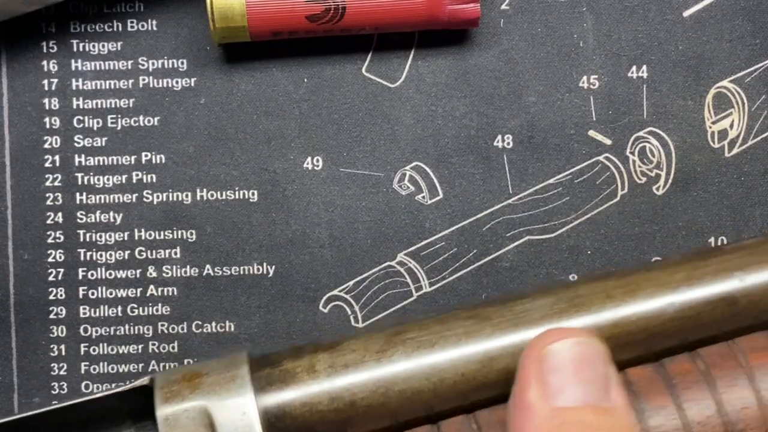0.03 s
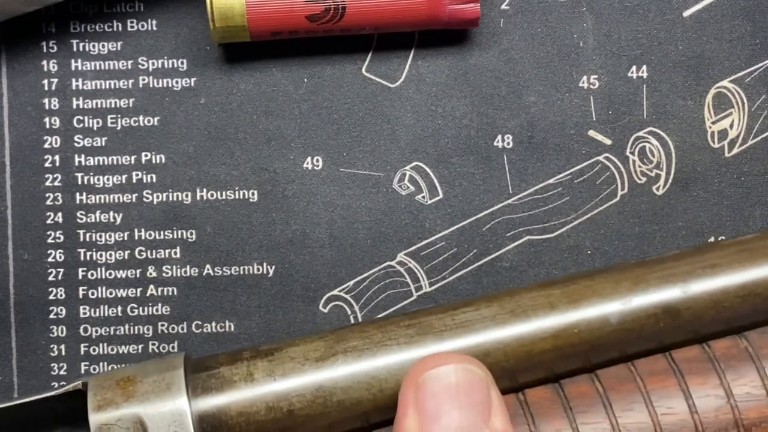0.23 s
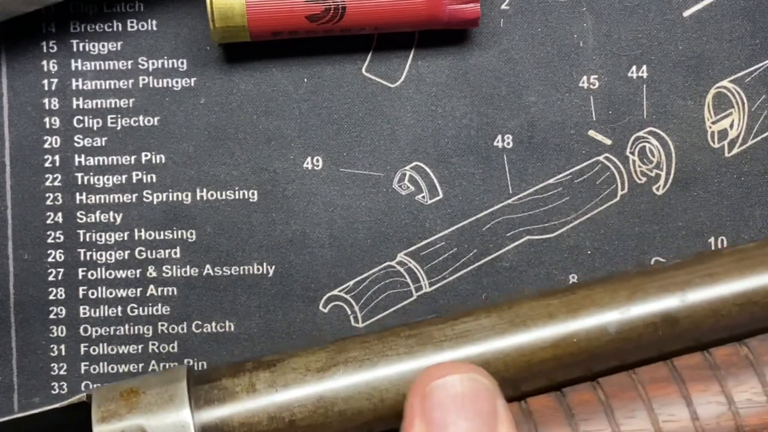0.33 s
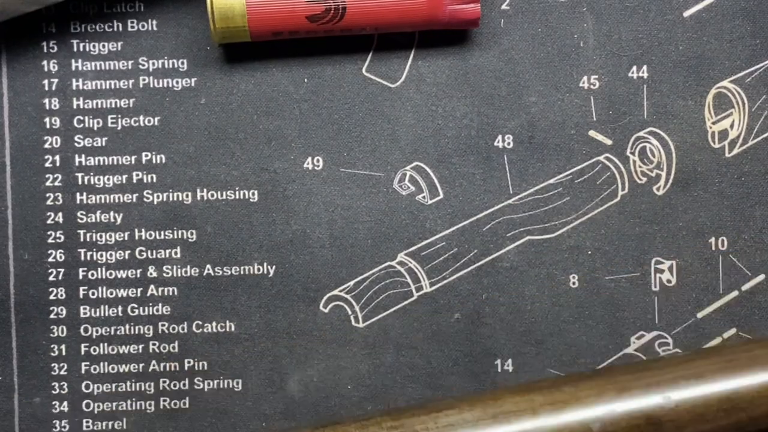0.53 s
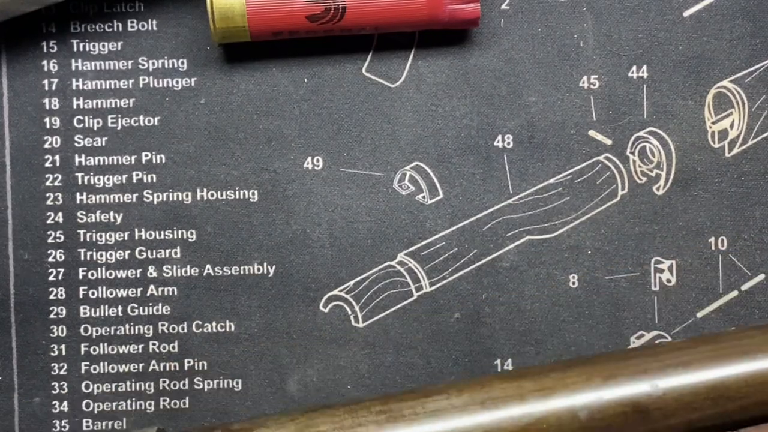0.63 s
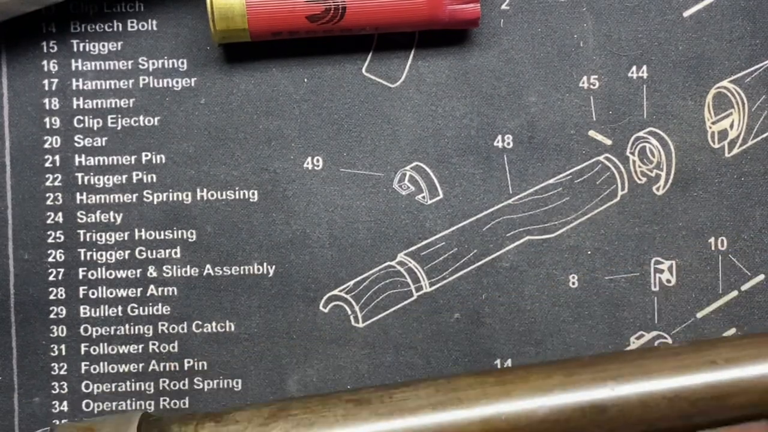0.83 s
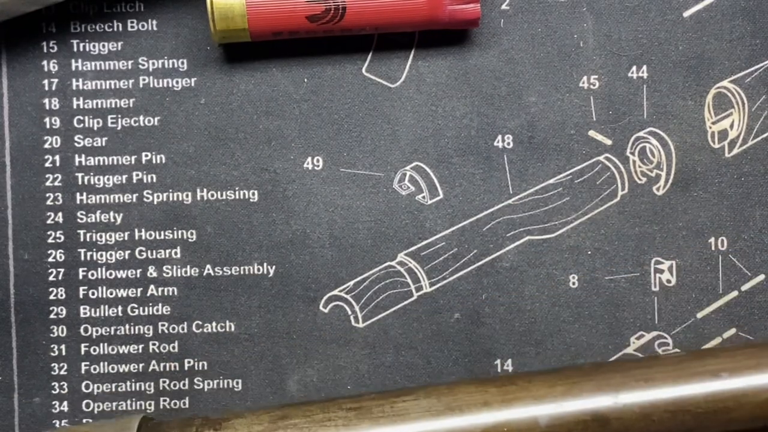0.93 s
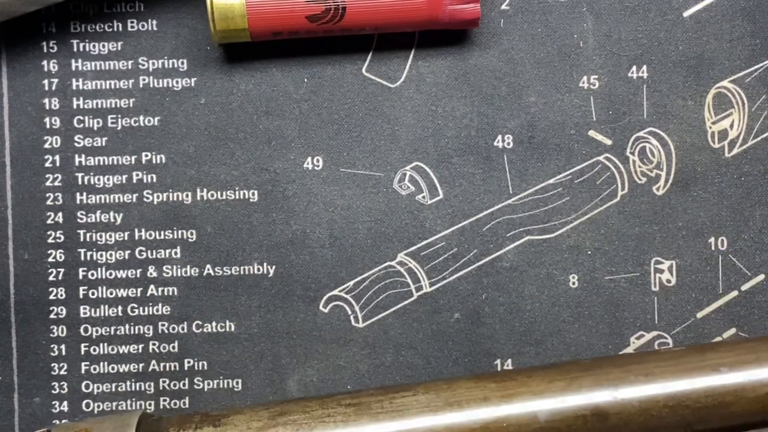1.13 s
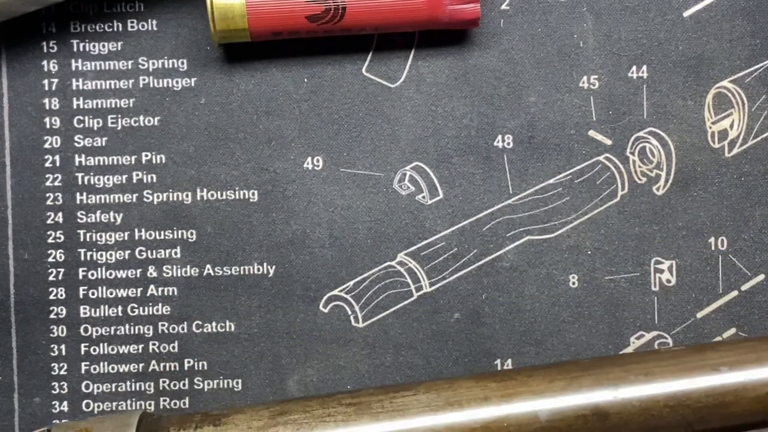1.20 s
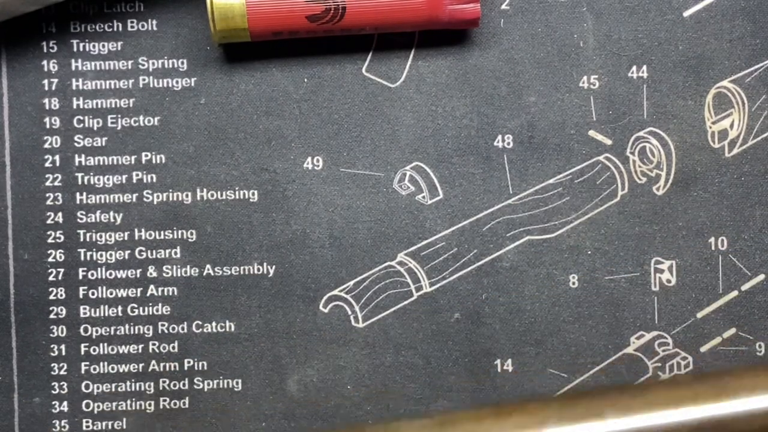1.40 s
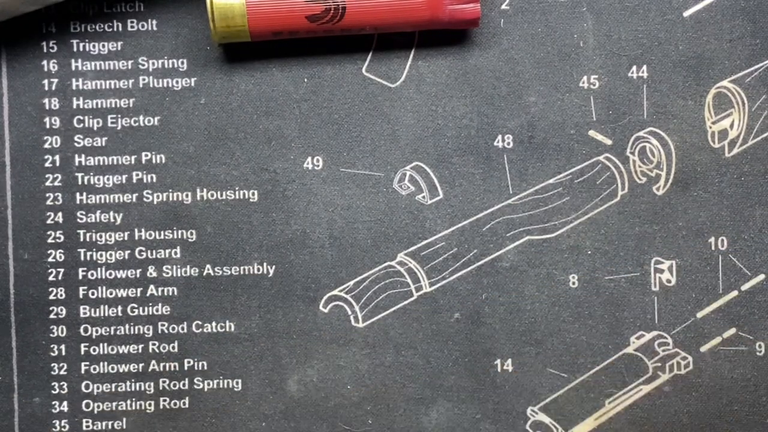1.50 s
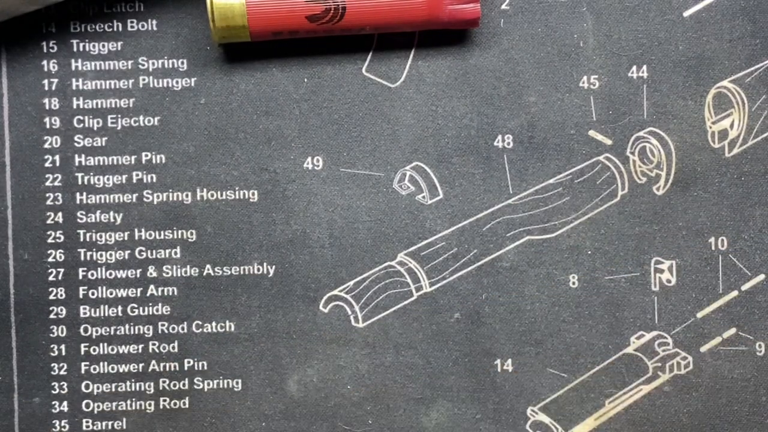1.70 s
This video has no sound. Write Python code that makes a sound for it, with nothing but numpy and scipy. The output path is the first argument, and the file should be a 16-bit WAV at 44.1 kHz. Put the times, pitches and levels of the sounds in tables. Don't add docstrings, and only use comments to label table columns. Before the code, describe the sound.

Two rattling metallic clacks and a dull thump as a heavy gun is picked up close by

```python
import sys
import numpy as np
from scipy import signal
from scipy.fft import rfft, irfft
from scipy.io import wavfile
from scipy.ndimage import uniform_filter1d

SR = 44100
rng = np.random.default_rng(int(sys.argv[2]) if len(sys.argv) > 2 else 0)


def dump_mix(stems):
    frames = np.atleast_2d(stems).T
    limited = np.clip(frames, -1, 1)
    pcm = np.round(limited * 32767).astype(np.int16)
    wavfile.write(sys.argv[1], SR, pcm)


def natural_amplitude(level_db):
    exponent = np.asarray(level_db, float) / 20
    return 10 ** exponent


N = 77175
T = np.arange(N) / SR
MID_SIDE = np.array([[1], [-1]])


def level(x, db):
    return x * natural_amplitude(db) / np.sqrt(np.mean(x ** 2))


def curve(rows):
    return np.interp(T, *np.array(rows, float).T)


def colour(x, points):
    hz, db = np.array(points, float).T
    f = np.arange(N // 2 + 1) * SR / N + 1
    return irfft(rfft(x) * natural_amplitude(np.interp(np.log(f), np.log(hz + 1), db)), N)


def band(x, low_hz, high_hz):
    sos = signal.butter(2, [low_hz, min(high_hz, .45 * SR)], "band", fs=SR, output="sos")
    return signal.sosfilt(sos, x)


def walk(rate_hz):
    k = int(SR / rate_hz)
    steps = np.repeat(rng.standard_normal(N // k + 1), k)
    return 1.7 * uniform_filter1d(uniform_filter1d(steps, k), k)[:N]


def air():
    # freq_hz, density_db [dB per Hz]
    air_colour = [(80, -17), (140, -7), (270, -17.5), (1100, -28.5), (1800, -26), (4500, -40.5),
                  (11800, -53.5), (13800, -46)]
    # time_s, gain_db
    duck = [(0, 22), (.34, 8), (.58, -11), (.7, -13), (.8, 10)]
    air_db, side_db = -75, -6
    hum_hz, hum_db = 311, -83
    duct_hz, duct_width_hz, duct_db = 1680, 260, -80
    whine_hz, whine_pulses_hz, whine_db = 10500, 60, -99

    mid, side = (level(colour(rng.standard_normal(N), air_colour), air_db) * natural_amplitude(0.85 * walk(4.2))
                 for _ in range(2))
    hum = natural_amplitude(hum_db + 2.6 * walk(22)) * np.sin(2 * np.pi * hum_hz * T)
    duct = band(rng.standard_normal(N), duct_hz - duct_width_hz / 2, duct_hz + duct_width_hz / 2)
    whine = band(rng.standard_normal(N), whine_hz - 200, whine_hz + 200)
    whine = whine * np.sin(np.pi * whine_pulses_hz * T) ** 4
    centre = mid + hum + level(duct, duct_db) + level(whine, whine_db)
    return (centre + natural_amplitude(side_db) * side * MID_SIDE) * natural_amplitude(curve(duck))


def rumble(db):
    centre_hz, width_hz = 70, 85
    edges_hz = centre_hz - width_hz / 2, centre_hz + width_hz / 2
    noise = band(band(rng.standard_normal(N), *edges_hz), *edges_hz)
    return level(noise * natural_amplitude(walk(9.2)), db)


def bench():
    # start_s, level_db, start_hz, end_hz, t60_s
    thumps = [
        (0.114, -34.5, 500, 61.3, 0.091),
        (0.179, -42.5, 604, 93, 0.048),
        (0.367, -42.5, 500, 110, .07),
        (.407, -43.5, 500, 110, .07),
        (0.483, -18, 620, 40.8, 0.14),
        (0.498, -27, 406.7, 48.8, 0.031),
        (.558, -48.5, 494, 60.1, 0.079),
    ]
    # centre_s, level_db, pitch_hz, half_length_s
    sways = [
        (0.002, -40, 84, 0.014),
        (0.317, -46, 57.4, 0.044),
        (0.672, -42, 46.5, 0.082),
        (.80, -47, 50, 0.015),
        (0.83, -39.5, 45, 0.027),
        (0.874, -26, 52, 0.018),
        (0.925, -39.5, 65, 0.012),
        (0.978, -45, 71.2, 0.012),
        (1.046, -51, 47, 0.12),
        (1.329, -45.5, 70, 0.014),
    ]
    rumble_db, side_db = -57, -76
    spread_turns = 0.78

    out = rumble(rumble_db) + rumble(side_db) * MID_SIDE
    for s, db, start_hz, end_hz, t60 in thumps:
        t = np.maximum(T - s, 0)
        turns = end_hz * t + spread_turns * np.log(1 + t * start_hz / spread_turns)
        out = out + natural_amplitude(db - 60 * t / t60) * np.sin(2 * np.pi * turns)
    for s, db, hz, half_s in sways:
        out = out + natural_amplitude(db) * np.exp(-((T - s) / half_s) ** 2) * np.cos(2 * np.pi * hz * (T - s))
    return out


def rub():
    # time_s, level_db
    strength = [(0, -54.5), (.07, -53), (.2, -46), (.27, -75.5), (.7, -81.5), (.78, -64.5), (.85, -64.5),
                (.95, -75.5), (1.06, -86), (1.16, -86.5), (1.24, -73.5), (1.32, -65.5), (1.35, -59.5),
                (1.39, -58), (1.43, -65), (1.485, -59), (1.6, -62), (1.67, -58.5), (1.75, -60)]
    # freq_hz, density_db [dB per Hz]
    friction_colour = [(200, -15.5), (600, -6), (1600, -2), (4800, -6), (8600, -9.5), (12000, -19),
                       (14500, -14.5)]
    # time_s, treble_db
    treble = [(0, -3.5), (.9, 0.5), (1.4, 4.5), (1.6, 6.5), (1.75, 9)]
    # pitch_hz, level_db
    resonances = [(1600, -13), (2300, -16), (5000, -25)]
    grit_db, uneven_db = 1.2, 1.5
    scrape_s, scrape_half_s, scrape_hz, scrape_db = 1.486, 0.031, 5130, -64

    grit = rng.standard_normal(N) * natural_amplitude(grit_db * rng.exponential(size=N) + uneven_db * walk(25))
    wide = level(colour(grit, friction_colour), 0)
    wide = wide + band(wide, 7000, 18000) * (natural_amplitude(curve(treble)) - 1)
    peaks = sum(level(band(grit, .87 * hz, 1.13 * hz), db) * natural_amplitude(4 * walk(9.3)) for hz, db in resonances)
    scrape = level(band(grit, 0.98 * scrape_hz, 1.1 * scrape_hz), scrape_db)
    scrape = scrape * np.exp(-((T - scrape_s) / scrape_half_s) ** 2)
    return (wide + peaks) * natural_amplitude(curve(strength)) + scrape


def earlier_knock():
    # pitch_hz, width_hz, level_db
    barrel = [(520, 120, -2.5), (834, 40, 1), (1680, 120, 2.5), (2420, 160, -4.5), (3300, 160, -3.5),
              (4890, 100, -6), (5300, 300, -8)]
    knock_db, t60_s = -43, .35
    tones = sum(level(band(rng.standard_normal(N), hz - width / 2, hz + width / 2), db)
                for hz, width, db in barrel)
    return level(tones, knock_db) * natural_amplitude(-60 * T / t60_s)


def ticks():
    # start_s, level_db, pitch_hz, crack_db
    clicks = [(.772, -53, 2500, 11), (.773, -63, 9430, 10), (.933, -68, 5000, 23), (1.008, -69.5, 2640, 12),
              (1.127, -73, 4100, 19), (1.166, -70, 5015, 18), (1.310, -65.5, 4600, 1.5),
              (1.338, -59, 4300, 5.5), (1.336, -66, 12000, 18), (1.350, -54, 6500, 18),
              (1.372, -57, 4083, 22), (1.377, -39, 1150, -15), (1.403, -51, 1600, 25),
              (1.444, -57.5, 4550, 12), (1.486, -61.5, 1970, 10)]
    tone_decay_s, crack_decay_s = 0.00195, 0.001
    out, t = np.zeros(N), T[:512]
    for s, db, hz, crack_db in clicks:
        tone = np.sin(2 * np.pi * hz * t) * np.exp(-t / tone_decay_s)
        crack = band(band(rng.standard_normal(512), hz / 2, 1.43 * hz), hz / 2, 1.515 * hz)
        crack = natural_amplitude(crack_db) * crack * np.exp(-t / crack_decay_s)
        start = int(s * SR)
        out[start:start + 512] += natural_amplitude(db) * (tone + crack)
    return out


def ring(x, modes):
    scatter_db, pitch_scatter = 3, .018
    t, h = T[:4096], 0
    for hz, db, t60 in modes:
        a, b = rng.standard_normal(2)
        decay = natural_amplitude(db + scatter_db * a - 60 * t / t60)
        h = h + decay * np.sin(2 * np.pi * hz * (1 + pitch_scatter * b) * t)
    return signal.fftconvolve(x, h / np.sqrt(np.sum(h ** 2)))[:len(x)]


def clatter(contacts, body_modes, thin_hz):
    # pitch_hz, level_db, t60_s
    plate_modes = [(3370, 4, .009), (4330, -0.5, .01), (4850, 5, .008), (5840, 0.5, .007),
                   (6460, -5.5, .008), (7450, 5, 0.0029)]
    # pitch_hz, level_db, t60_s
    edge_modes = [(9900, -2, 0.0043), (11000, -5.5, 0.0035), (13600, 4, 0.0065)]
    body_gain_db, plates_gain_db, edges_gain_db = -9, -1.5, -5.5
    chatter_db, crack_db = 0.5, 3.5
    rise_s, release, high_shorter = 0.00054, .3, .7
    grain_db = 4
    wash_body_db, wash_plates_db, wash_edges_db = 13, 10, 11

    size = 6144
    out, t = np.zeros((2, N)), T[:size]
    for s, body_db, plate_db, edge_db, length_s in contacts:
        lengths_s = length_s * np.array([[1], [high_shorter], [high_shorter]])
        fall = np.exp(-np.maximum(t - lengths_s, 0) / (release * length_s))
        shape = np.minimum(t / rise_s, 1) * fall
        push = rng.standard_normal((3, size)) * natural_amplitude(grain_db * rng.exponential(size=size)) * shape
        energy = np.sum(shape ** 2, axis=1, keepdims=True)
        push *= np.sqrt(energy / np.sum(push ** 2, axis=1, keepdims=True))
        push *= natural_amplitude([[body_gain_db + body_db], [plates_gain_db + plate_db], [edges_gain_db + edge_db]])

        body = ring(push[0], body_modes) + natural_amplitude(chatter_db) * band(band(push[0], 1500, 2900), 1500, 2900)
        plates = ring(push[1], plate_modes) + natural_amplitude(crack_db) * band(push[1], 3500, 8500)
        edges = ring(push[2], edge_modes) + natural_amplitude(crack_db) * band(push[2], 12800, 15500)
        wash = natural_amplitude(wash_body_db) * band(push[0], 1400, 2300)
        wash += natural_amplitude(wash_plates_db) * band(push[1], 3000, 8000)
        wash += natural_amplitude(wash_edges_db) * band(push[2], 8500, 15500)
        start = int(s * SR)
        out[:, start:start + size] += [body + plates + edges, wash]
    return signal.sosfilt(signal.butter(3, thin_hz, "high", fs=SR, output="sos"), out)


def shift():
    # start_s, body_db, plate_db, sizzle_db, contact_length_s
    contacts = [(.0768, -21.5, -26, -38.5, .002), (.0855, -21.5, -26, -35, .0015),
                (.097, -24.5, -41.5, -44.5, .003), (.104, -12, -24.5, -32.5, .002),
                (.1132, 0.5, -9.5, -23, .0035), (.118, -6.5, -18, -27.5, .003),
                (.125, -5, -18.5, -34, .002), (.1277, -6.5, -24.5, -43.5, .002),
                (.1305, -11.5, -30, -45, .003), (.138, -27, -40.5, -46.5, .003),
                (.1435, -22, -42, -48, .003), (.150, -30.5, -44.5, -42.5, .005),
                (.159, -25.5, -44.5, -50, .002), (.167, -12.5, -29.5, -37, .003),
                (.172, -10, -21, -31.5, .003), (.177, -12, -17, -32, .003), (.182, -8.5, -20, -39.5, .003),
                (.196, -26.5, -49, -55.5, .008)]
    # pitch_hz, level_db, t60_s
    body_modes = [(561, -17, .02), (780, -25, 0.014), (850, -18, .025), (1150, -10.5, .015),
                  (1500, 4.5, .022), (1860, -6, .016), (1940, 6, 0.066), (2140, 6, .014), (2280, 4, .015),
                  (2630, -8.5, 0.018), (2950, -12.5, .01)]
    return clatter(contacts, body_modes, thin_hz=520)


def lift():
    # start_s, body_db, plate_db, sizzle_db, contact_length_s
    contacts = [(.351, -39.5, -58, -75.5, .005), (.356, -35, -44.5, -43.5, .002),
                (.363, -26, -27, -34, .003), (.3668, 1.5, -14.5, -27, .003),
                (.3695, -1.5, -12, -25.5, 0.0022), (.372, -9.5, -8.5, -20.5, 0.0018),
                (.376, -6, -13.5, -21, .002), (.3795, -10.5, -24, -28, .003),
                (.3835, -14.5, -24, -26, .002), (.392, -13, -19, -28, .002), (.394, -7, -21.5, -32, .003),
                (.3995, -16, -30, -36.5, .002), (.4015, -15.5, -22, -30, .003),
                (.4057, 4, -12.5, -19.5, 0.0028), (.413, -14, -20.5, -18, .005),
                (.4195, -9, -11.5, -13, .003), (.4225, -8, -7, -13, .003), (.426, -12.5, -11, -24.5, .002),
                (.4345, -13.5, -25.5, -38, .003), (.440, -19, -27, -31, .003), (.449, -14, -26, -22, .004),
                (.4685, -14.5, -21.5, -27.5, .004), (.4805, -16, -11.5, -10, .002),
                (.484, -15.5, -9, -19.5, .002), (.492, -14, -18, -24, .003), (.4965, -11, -12, -14.5, .003),
                (.501, -19, -24, -24.5, .002)]
    # pitch_hz, level_db, t60_s
    body_modes = [(885, -21, .06), (1560, -19, .012), (1760, -14, .012), (1950, 0, .015), (2060, 2, .014),
                  (2160, 3, .013), (2270, 2, .013), (2620, -7, .009), (3180, -11, .01)]
    return clatter(contacts, body_modes, thin_hz=900)


def room(x):
    room_db, split_hz = -12.5, 4500
    low_t60_s, high_t60_s = 0.13, 0.073
    t, noise = T[:16384], rng.standard_normal((2, 16384))
    low = band(noise[0], 350, split_hz) * natural_amplitude(-60 * t / low_t60_s)
    high = band(noise[1], split_hz, 23000) * natural_amplitude(-60 * t / high_t60_s)
    h = low + high
    return signal.fftconvolve(x, h / np.sqrt(np.sum(h ** 2)))[:N] * natural_amplitude(room_db)


def ports(x):
    # freq_hz, left_lead_half_turns
    port_phase = [(0, 0), (600, .3), (1460, -.3), (2840, .15), (6900, -.06), (8550, -1), (9700, -1.9),
                  (10600, -2.15), (12050, -3), (14000, -4), (16000, -5)]
    # freq_hz, left_minus_right_db
    port_balance = [(250, 0), (650, 6), (1200, -1), (16000, -.5)]
    f = np.arange(N // 2 + 1) * SR / N
    phase = np.pi * np.interp(f, *np.array(port_phase, float).T)
    hz, balance_db = np.array(port_balance, float).T
    db = np.interp(np.log(f + 1), np.log(hz + 1), balance_db)
    half = natural_amplitude(db / 2) * np.exp(.5j * phase)
    return irfft(rfft(x) * np.array([half, 1 / half]), N)


def scene():
    loose_db, stock_db, stock_lag_s = 5, 8.5, .009
    near, wash = shift() + lift() + earlier_knock() + ticks()
    loose = natural_amplitude(loose_db) * band(room(near), 400, 1300) * MID_SIDE
    stock = natural_amplitude(stock_db) * np.roll(band(room(near), 680, 960), int(stock_lag_s * SR))
    return ports(near + room(wash) + stock + rub()) + loose + bench() + air()


def top_cut(x):
    return signal.sosfilt(signal.butter(12, 16480, fs=SR, output="sos"), x)


def record(dry):
    top_hz = 15900
    low_pass = signal.ellip(8, .2, 70, top_hz, fs=SR, output="sos")
    finished = signal.sosfilt(low_pass, np.tanh(dry), axis=1)
    return top_cut(finished)


dry = scene()
out = record(dry)
dump_mix(out)
```